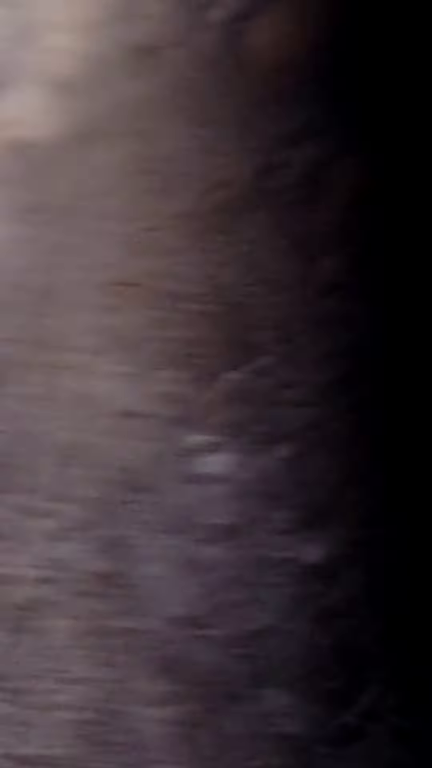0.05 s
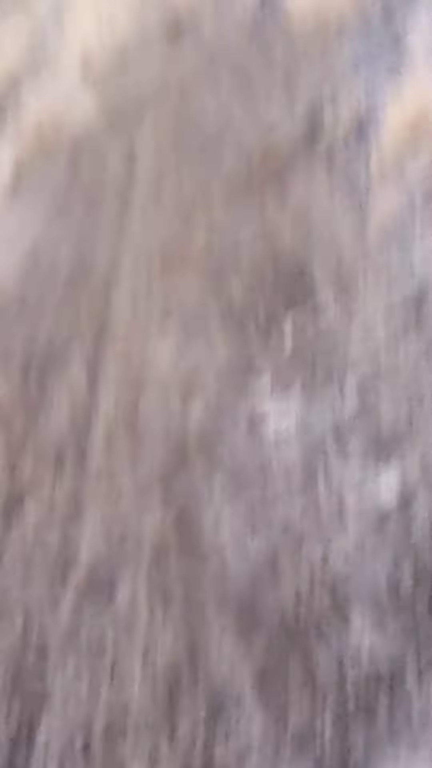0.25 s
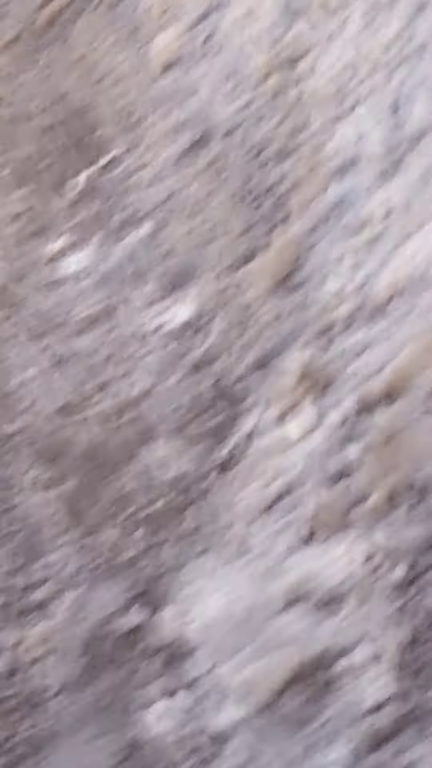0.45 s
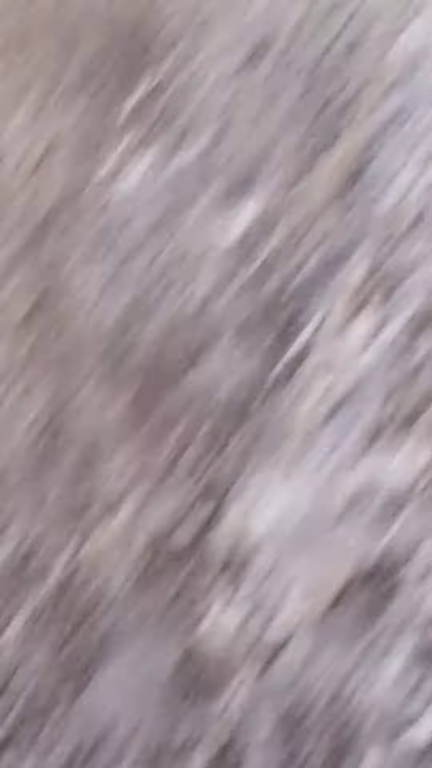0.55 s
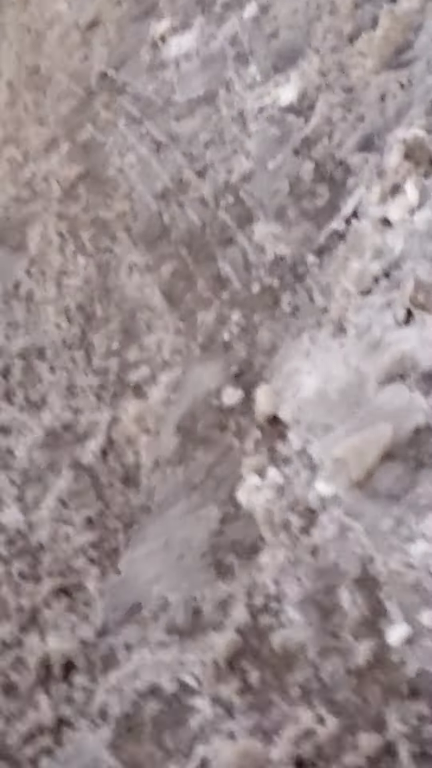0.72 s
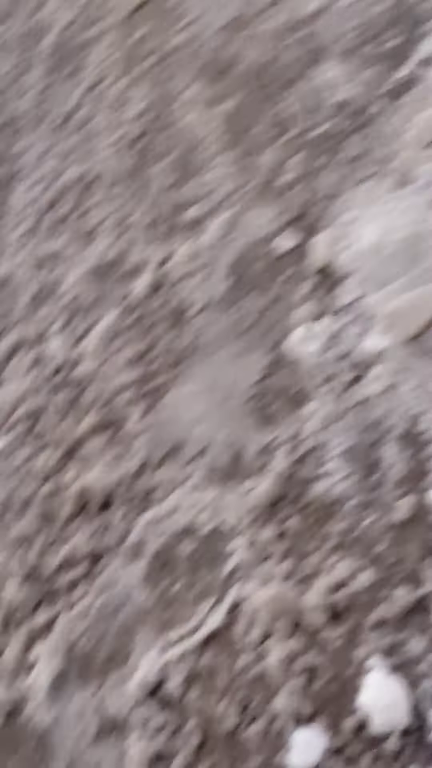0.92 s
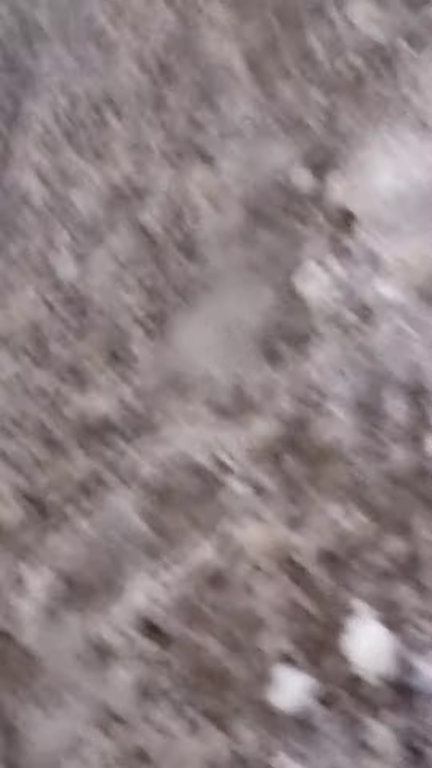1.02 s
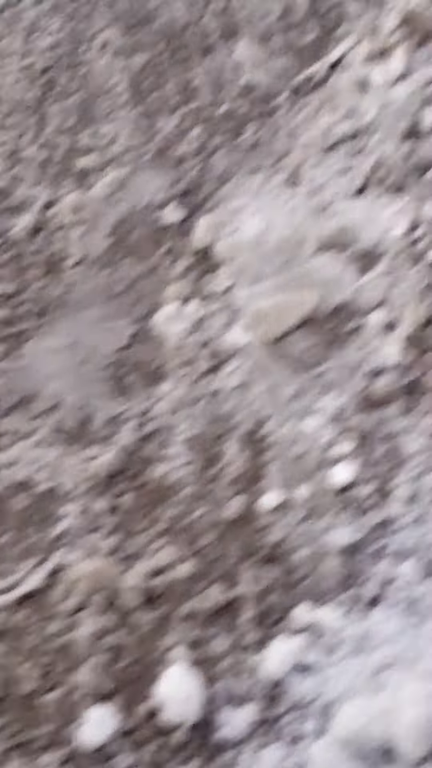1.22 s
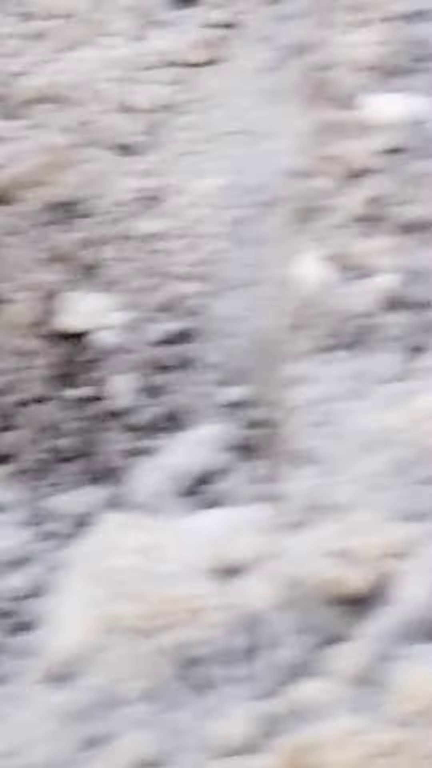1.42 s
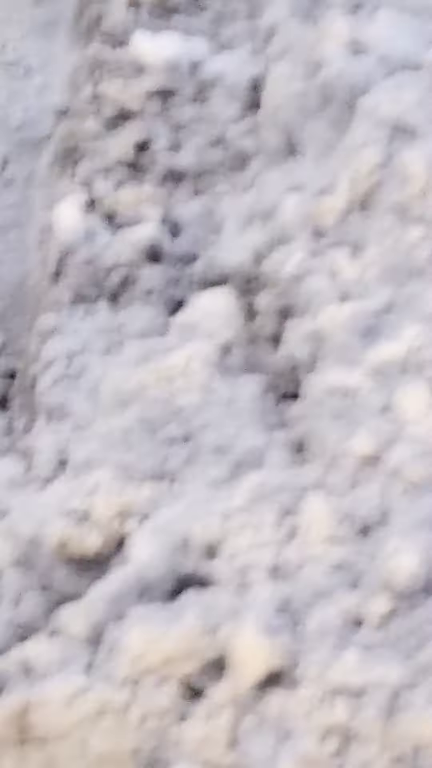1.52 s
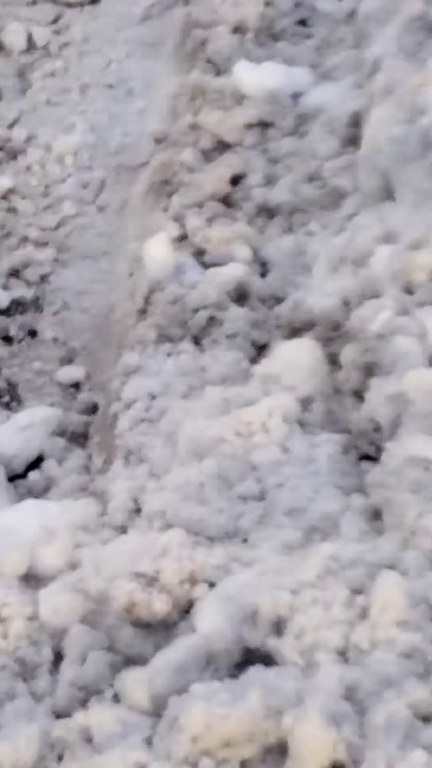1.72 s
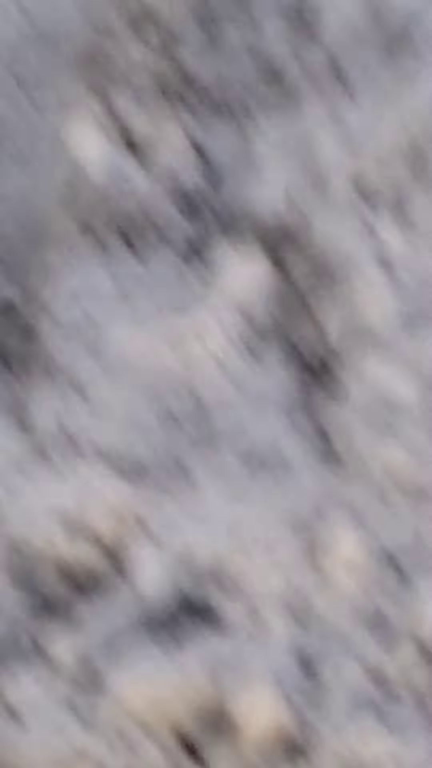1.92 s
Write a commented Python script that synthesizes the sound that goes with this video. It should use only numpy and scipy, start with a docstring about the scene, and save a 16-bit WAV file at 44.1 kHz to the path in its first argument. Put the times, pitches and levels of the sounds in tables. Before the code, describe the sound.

Footsteps crunch through wet, lumpy slush close to the microphone, with swishes, small squelches and snapping ice crumbs. A boot knocks on a frozen lump, then more steps follow. An idling engine hums low outdoors.

```python
"""Someone walks through clumpy slush on a roadside while an engine idles nearby.
From the start the engine hums over a low rumble, a faint hiss and a thin whine. The first stride
brings a bright swish, wet snow crunches under the sole and ice crumbs snap. Then wet pockets squelch
as they are squeezed, and at half a second a boot knocks down on a frozen lump.
More steps follow, with a busy cluster of crunches and knocks near the end."""
import sys
import numpy as np
from scipy import signal
from scipy.fft import rfft, irfft
from scipy.io import wavfile

SR = 44100
rng = np.random.default_rng(int(sys.argv[2]) if len(sys.argv) > 2 else 0)


def master(y):
    """Save y as 16-bit WAV."""
    cut = np.clip(np.atleast_2d(y).T, -1, 1)
    pcm = np.round(cut * 32767)  # scale
    wavfile.write(sys.argv[1], SR, pcm.astype(np.int16))


N = 85995
T = np.arange(N) / SR


def from_db(db):
    """Turn decibels into a number to multiply by."""
    return 10 ** (np.asarray(db) / 20)


def rms_one(x):
    """Scale a signal so that its average strength (rms) is 1."""
    return x / np.sqrt(np.mean(x ** 2) + 1e-20)


def panned(db):
    """Share a sound between the two sides; positive db is louder on the left."""
    return rms_one(from_db([[db / 2], [-db / 2]]))


def at_hz(points, hz):
    """Read between the rows of a table, giving each octave equal room."""
    pitches, values = np.transpose(points)
    return np.interp(np.log(hz), np.log(pitches), values)


def filtered(x, hz, kind):
    """Keep the "low" side, the "high" side or a "band" of a sound."""
    return signal.sosfilt(signal.butter(2, hz, kind, fs=SR, output="sos"), x + 1e-18)


def noise():
    """Two unrelated white noises."""
    return rng.standard_normal((2, N))


def drift(rate_hz):
    """A slow random wander, about 1 in size."""
    r = np.exp(-80 * np.pi * rate_hz / SR)
    slow = signal.lfilter([1], [1, -2 * r, r * r], rng.standard_normal(N // 40 + 2002))[2000:]
    return np.interp(np.arange(N) / 40, np.arange(len(slow)), rms_one(slow))


def click(start_s):
    """A click one sample long."""
    return 1.0 * (np.arange(N) == int(start_s * SR))


def ring(x, hz, ring_s):
    """Each click in x starts a tone that fades by 60 dB in ring_s."""
    decay = np.exp(-np.log(1000) / (ring_s * SR))
    angle = 2 * np.pi * hz / SR
    return signal.lfilter([0, np.sin(angle)], [1, -2 * decay * np.cos(angle), decay ** 2], x + 1e-18)


def swell(peak_s, rise_s, fall_s):
    """A bell-shaped loudness curve with its own rise and fall."""
    return np.exp(-((T - peak_s) / np.where(T < peak_s, rise_s, fall_s)) ** 2)


def tick_sizes(spread_db, limit):
    """Random sizes of either sign: mostly small, at most limit * spread_db louder."""
    return from_db(spread_db * np.minimum(rng.exponential(1, (2, N)), limit)) * np.sign(noise())


def grains(per_s, spread_db, blur_db):
    """Tiny random breaks of uneven size, over a blur of still finer ones."""
    ticks = tick_sizes(spread_db, limit=4) * (rng.random((2, N)) < per_s / SR)
    return rms_one(ticks) + from_db(blur_db) * noise()


# How alike left and right are: pitch_hz, likeness (0 unrelated, 1 the same)
STEREO_LIKENESS = [(30, 0.74), (100, 0.43), (180, 0.75), (300, 0.62), (600, 0.18), (1200, 0), (2500, 0.025),
                   (14000, 0)]
def coloured(pair, colour, tilt_db=0):
    """Give two noises a tone colour and make them alike in the bass; tilt_db brightens per octave."""
    hz = np.fft.rfftfreq(N, 1 / SR) + 1
    alike = at_hz(STEREO_LIKENESS, hz)
    bass_cut = 1 / np.sqrt(1 + (colour[0][0] / hz) ** 4)
    mid, side = rfft(pair) * bass_cut * from_db(at_hz(colour, hz) + tilt_db * np.log2(hz))
    stereo = np.sqrt(1 + alike) * mid + np.sqrt(1 - alike) * side * [[1], [-1]]
    return rms_one(irfft(stereo, N))


# The tones in the engine's hum: multiple of ENGINE_HZ, level_db
ENGINE_TONES = [(1, -45), (2, -37), (3, -42), (4, -63), (5, -56), (6, -53.5), (7, -54)]
# How the whole hum swells and dips: time_s, change_db
ENGINE_SWELLS = [(0, -3), (.2, 0), (.4, 6.5), (.65, -1), (1.2, 1.5), (1.5, -1), (1.65, -12), (1.8, -1),
                 (1.95, -8)]
ENGINE_HZ, ENGINE_WANDER, ENGINE_FLUTTER_DB = 35.14, 0.0076, 1
def engine():
    """An idling engine hums in low, fluttering tones that reach the two microphones out of step."""
    turn = 2 * np.pi * np.cumsum(ENGINE_HZ * (1 + ENGINE_WANDER * drift(5.1))) / SR
    hum = 0
    for multiple, level_db in ENGINE_TONES:
        phase = round(multiple) * turn + rng.uniform(0, 2 * np.pi)
        out_of_step = 0.24 * drift(6) * [[.5], [-.5]]  # radians
        level = from_db(level_db + ENGINE_FLUTTER_DB * drift(15.6))
        hum = hum + level * np.sqrt(2) * np.sin(phase + out_of_step)
    return hum * from_db(np.interp(T, *np.transpose(ENGINE_SWELLS))) * panned(db=0.5)


# Tone colours of the rumble, the outdoor air and the microphones' own hiss: pitch_hz, level_db
RUMBLE_COLOUR = [(30, -30), (38, 2), (55, 3.5), (110, 8), (180, -8.5), (280, -5.5), (400, -12.5),
                 (600, -22), (1000, -51), (3000, -66)]
AIR_COLOUR = [(300, 15), (1000, 5), (2200, 2.5), (3200, -4.5), (4600, -7.5), (6200, -12), (9000, -8),
              (11000, -21), (15000, -36)]
MIC_COLOUR = [(5000, -12), (8000, -25), (10500, 4), (12500, 5), (15000, 5)]
RUMBLE_DB, RUMBLE_GUST_DB, AIR_DB, MIC_DB = -38, 2.5, -51.5, -67
def background():
    """A wavering low rumble, faint outdoor hiss and noise mostly from the right microphone."""
    rumble = from_db(RUMBLE_DB + RUMBLE_GUST_DB * drift(5.2)) * coloured(noise(), RUMBLE_COLOUR)
    air = from_db(AIR_DB) * panned(db=-1) * coloured(noise(), AIR_COLOUR)
    hiss = from_db(MIC_DB) * panned(db=-26) * coloured(noise(), MIC_COLOUR)
    return rumble + air + hiss


# How the whine swells and dips: time_s, change_db
WHINE_SWELLS = [(0, 7), (.2, 4), (.5, -1), (.7, 3), (1.0, -5), (1.15, 2.5), (1.45, -5.5), (1.95, 2.5)]
WHINE_HZ, WHINE_WIDTH_HZ, WHINE_DB = 7444, 290, -65.5
def whine():
    """A narrow band of noise makes a thin, high whine."""
    band = filtered(noise(), [WHINE_HZ - WHINE_WIDTH_HZ / 2, WHINE_HZ + WHINE_WIDTH_HZ / 2], "band")
    return from_db(WHINE_DB + np.interp(T, *np.transpose(WHINE_SWELLS))) * rms_one(band)


def bursts(texture, events, colour):
    """Make one swell of a grainy texture per event, each starting elsewhere in the texture."""
    out = 0
    for peak_s, rise_s, fall_s, level_db, tilt_db, pan_db in events:
        grit = coloured(np.roll(texture, rng.integers(N), axis=1), colour, tilt_db)
        out = out + from_db(level_db) * panned(pan_db) * swell(peak_s, rise_s, fall_s) * grit
    return out


# The swishes of the strides: peak_s, rise_s, fall_s, level_db, brightness_db_per_octave, pan_db
STRIDE_SWISHES = [(.066, 0.053, 0.058, -41, .5, -4), (.19, 0.098, 0.15, -44.5, -0.3, -3.5),
                  (.40, 0.067, 0.08, -51, 2.5, 6), (.47, 0.077, 0.076, -41.5, -1.5, -3),
                  (.548, 0.11, 0.053, -44.5, 2.5, 1), (.71, 0.097, 0.056, -50, -1.5, -4),
                  (.91, 0.023, 0.047, -53.5, 0.5, 1), (1.07, 0.06, 0.12, -51, -1.5, -6),
                  (1.235, 0.023, 0.02, -56.5, -0.5, -8), (1.60, 0.14, 0.044, -47.5, 0, -3.5),
                  (1.765, 0.067, 0.029, -49, 0.5, -3.5), (1.86, 0.083, 0.11, -49.5, -1.5, -2.5)]
# Tone colour of a swish: pitch_hz, level_db
SWISH_COLOUR = [(300, 7), (800, 2.5), (2000, -1), (3000, -4.5), (4500, -6), (6200, -12), (8500, -11.5),
                (10500, -13.5), (12500, -11.5), (15000, -21.5)]
def swishes():
    """Fine, bright rubbing swells and fades with each stride."""
    rubbing = grains(per_s=6000, spread_db=1, blur_db=3)
    return bursts(rubbing, STRIDE_SWISHES, SWISH_COLOUR)


CRUMBS_PER_S, CRUMBS_DB, CRUMB_RING_CYCLES = 110, -61.5, 4.5
def crumbs():
    """Loose bits of slush tick at random, louder while a stride swishes."""
    stir = sum(from_db(db) * swell(*timing) for *timing, db, _, _ in STRIDE_SWISHES) + from_db(AIR_DB)
    pitches_hz = np.geomspace(1080, 5400, 10)
    ticks = 0
    for hz in pitches_hz:
        starts = rng.random(N) < CRUMBS_PER_S / len(pitches_hz) / SR
        ticks = ticks + ring(starts * tick_sizes(spread_db=6, limit=2), hz, CRUMB_RING_CYCLES / hz)
    return from_db(CRUMBS_DB) * rms_one(ticks * stir ** 0.63)  # swells less than the swishes do


# A sole presses the slush: peak_s, rise_s, fall_s, level_db, brightness_db_per_octave, pan_db
SOLE_PRESSES = [(0.071, 0.042, 0.0089, -34.5, 3.5, -9.5), (0.213, 0.054, 0.049, -38, -0.5, -6.5),
                (.345, 0.093, 0.02, -38.5, -1.5, -2.5), (0.436, 0.048, 0.088, -34.5, -2, -3.5),
                (0.524, 0.039, 0.057, -35, 1, -11), (.664, .006, 0.014, -45.5, 2, -8),
                (0.913, 0.023, 0.0096, -37.5, -5, -1), (1.222, 0.012, 0.015, -31, -11, -2.5),
                (1.592, 0.059, 0.031, -33, -1.5, -3), (1.63, 0.016, 0.0057, -35, 2, -3),
                (1.697, 0.013, 0.075, -38, 0.5, -8), (1.768, 0.011, 0.016, -41, 0.5, -5),
                (1.82, 0.035, 0.048, -41.5, 1.5, -8.5), (1.869, 0.028, 0.025, -43, 2.5, -24),
                (1.92, 0.034, 0.031, -40, -5, -2)]
# Tone colour of crunching snow: pitch_hz, level_db
SNOW_COLOUR = [(130, -9), (220, -4), (380, -1), (600, -6.5), (900, -12.5), (1400, -13.5), (2500, -22),
               (5000, -34.5), (14000, -47)]
SNOW_GRAINS = dict(per_s=1100, spread_db=3.5, blur_db=-6)
def crunches():
    """Wet snow gives way under the boot in swells of dull grains."""
    return bursts(grains(**SNOW_GRAINS), SOLE_PRESSES, SNOW_COLOUR)


# Single ice crumbs break: start_s, ring_db, pitch_hz, edge_db, pan_db
ICE_SNAPS = [(0.075, -16.5, 1530, -33, -23), (.3112, -36, 11500, -22, 8), (.4395, -26, 1700, -42, -2),
             (0.656, -32, 2450, -50, -10), (.6562, -26, 816, -55, 6), (.679, -34, 2490, -40, -9),
             (0.8322, -35, 2320, -53, -5), (1.2028, -28.5, 1270, -55, -8), (1.215, -43, 8000, -40, -7),
             (1.2768, -30, 2280, -15.5, -15), (1.3147, -45, 1200, -19.5, -9), (1.5563, -35, 3020, -33, -15),
             (1.5712, -22, 650, -45, -20), (1.6302, -24.5, 1520, -34, -14), (1.682, -25.5, 745, -55, 4)]
def snaps():
    """An ice crumb breaks with a sharp edge of sound and rings for a few cycles."""
    out = 0
    for start_s, ring_db, pitch_hz, edge_db, pan_db in ICE_SNAPS:
        edge = filtered(filtered(click(start_s), hz=900, kind="high"), hz=4200, kind="low")
        tone = ring(click(start_s), pitch_hz, CRUMB_RING_CYCLES / pitch_hz)
        out = out + panned(pan_db) * (from_db(ring_db) * tone + from_db(edge_db) * edge)
    return out


# Wet pockets in the slush are squeezed: peak_s, half_length_s, pitch_hz, level_db, pan_db
WET_POCKETS = [(0.392, 0.051, 371, -37.5, 2.5), (0.658, 0.0051, 2490, -44.5, 1),
               (0.441, 0.034, 438, -38.5, 1), (1.189, 0.045, 157.7, -38.5, 1.5),
               (1.523, .025, 326, -38.5, -7), (1.589, 0.032, 628, -40, -11), (1.617, 0.017, 940, -40, -7),
               (1.63, 0.0057, 1265, -37, -1), (1.685, 0.007, 668, -41, 0), (1.704, 0.018, 620, -38.5, -3),
               (1.77, 0.01, 1560, -45.5, -3), (1.771, 0.021, 387, -37, 1), (1.869, 0.027, 2030, -48, -22)]
POCKET_Q = 7.1  # pitch divided by band width: higher is a purer tone
def squelches():
    """Breaking grains set a water-filled pocket ringing with a short, hollow tone."""
    snow = coloured(grains(**SNOW_GRAINS), SNOW_COLOUR)
    half_width = .5 / POCKET_Q
    out = 0
    for peak_s, half_length_s, pitch_hz, level_db, pan_db in WET_POCKETS:
        tone = filtered(snow, [pitch_hz * (1 - half_width), pitch_hz * (1 + half_width)], "band")
        shape = swell(peak_s, half_length_s, half_length_s)
        squelch = rms_one(tone * shape) * np.sqrt(np.mean(shape ** 2))  # strength about 1 at the peak
        out = out + from_db(level_db) * panned(pan_db) * squelch
    return out


def struck(push, tones, uneven_db, left_lag_s):
    """A struck object rings, a bit differently per blow and side; the left side hears it later."""
    left, right = sum(from_db(db + uneven_db * rng.standard_normal((2, 1))) * ring(push, hz, ring_s)
                      for hz, db, ring_s in tones)
    return np.array([np.interp(T - left_lag_s, T, left), right])


# A boot lands on a frozen lump: start_s, boot_db, lump_db, thud_db, crack_db
BOOT_KNOCKS = [(0.5145, -3, -36, -17, -21.5), (0.5192, -22.5, -29, -48, -38),
               (.9040, -20.5, -29.5, -9, -26.5), (0.9074, -21.5, -43, -34, -30),
               (1.2010, -39, -53, -19.5, -38), (1.5967, -31, -48, -20, -53.5), (1.6921, -33, -53, -29, -42),
               (1.8079, -30.5, -48, -19.5, -65)]
# The tones that the boot and the lump ring with: pitch_hz, level_db, ring_s
BOOT_TONES = [(180, -12.5, 0.072), (278, -18.5, 0.044), (427, 2.5, 0.018), (630, -14, 0.023),
              (754, -20, 0.045), (1467, -12, 0.017), (1700, -17, 0.027)]
LUMP_TONES = [(1153, -2.5, 0.026), (1490, -11, 0.018), (1604, -2, .026), (2090, -0.5, 0.041),
              (3230, -9, 0.034), (3200, -14.5, 0.025)]
# Tone colour of the cracking crust: pitch_hz, level_db
CRACK_COLOUR = [(200, -18), (600, 9.5), (1000, 10), (1500, 6), (2300, -4.5), (3300, -6), (5000, -28),
                (14000, -46)]
THUD_HZ, THUD_RING_S, CRACK_FADE_S = 86.4, 0.035, 0.023
def knocks():
    """Each landing rings the boot and the lump, thuds into the ground and cracks the crust."""
    crust = coloured(noise(), CRACK_COLOUR)
    out = 0
    for start_s, boot_db, lump_db, thud_db, crack_db in BOOT_KNOCKS:
        hit = click(start_s)
        soft_push = filtered(filtered(hit, hz=1800, kind="low"), hz=110, kind="high")
        boot = from_db(boot_db) * struck(soft_push, BOOT_TONES, uneven_db=2.15, left_lag_s=.00009)
        lump = from_db(lump_db) * struck(hit, LUMP_TONES, uneven_db=-1.0, left_lag_s=.00018)
        thud = from_db(thud_db) * ring(filtered(hit, THUD_HZ / 2, "high"), THUD_HZ, THUD_RING_S)
        fade = (T >= start_s) * np.exp(-np.log(1000) * np.abs(T - start_s) / CRACK_FADE_S)
        out = out + boot + lump - thud + from_db(crack_db) * fade * crust
    return out


def scene():
    """The walker close by, the engine further off."""
    walker = knocks() + crunches() + squelches() + swishes() + snaps() + crumbs()
    return walker + engine() + background() + whine()


LEFT_DULL_DB, BASS_CUT_HZ, TREBLE_CUT_HZ = -5, 27.3, 14650
def record(dry):
    """The left microphone is duller; the deepest bass is lost, peaks clip and the top treble is cut."""
    hz = np.fft.rfftfreq(N, 1 / SR) + 1
    dulling = from_db(at_hz([(7500, 0), (11000, LEFT_DULL_DB)], hz))
    left = irfft(rfft(dry[0]) * dulling, N)
    stereo = filtered(np.array([left, dry[1]]), BASS_CUT_HZ, "high")
    treble_cut = signal.ellip(12, .1, 80, TREBLE_CUT_HZ, fs=SR, output="sos")
    return signal.sosfilt(treble_cut, np.clip(stereo, -1, 1))


dry = scene()
out = record(dry)
master(out)
```